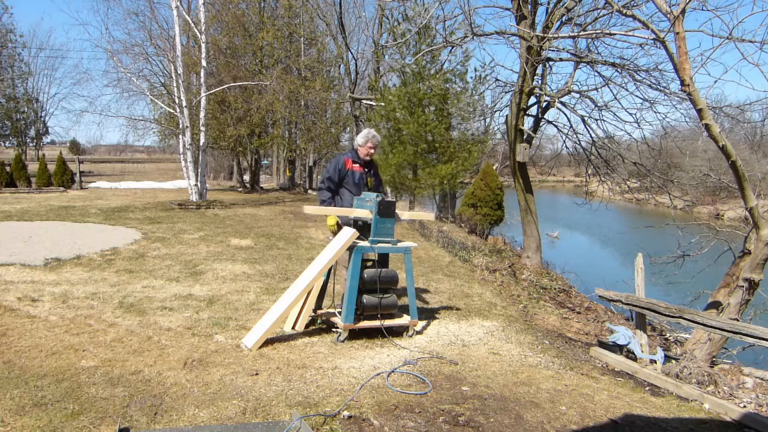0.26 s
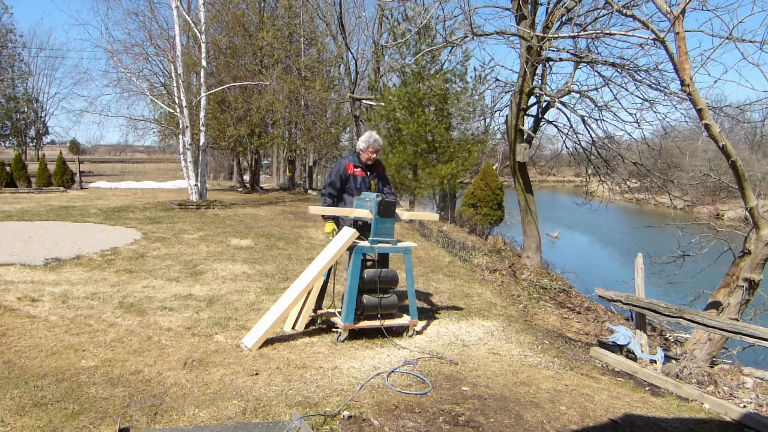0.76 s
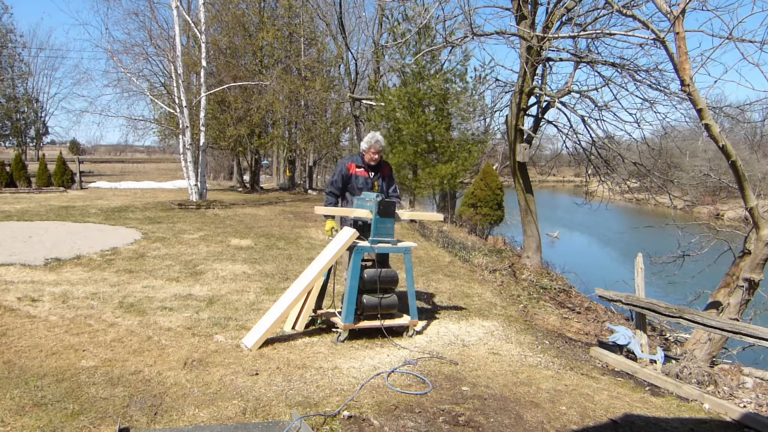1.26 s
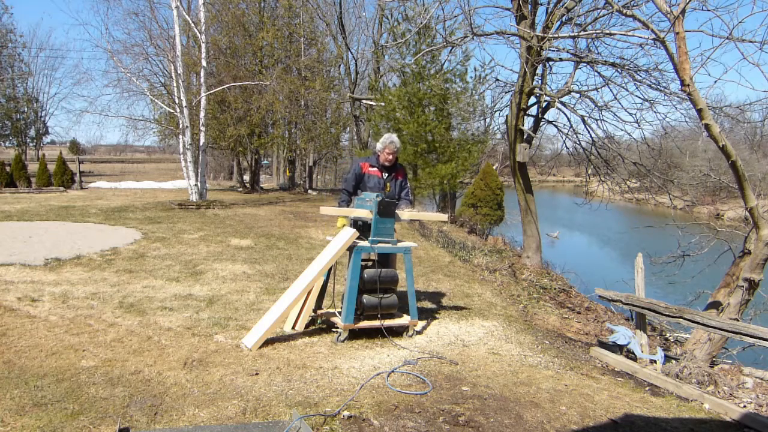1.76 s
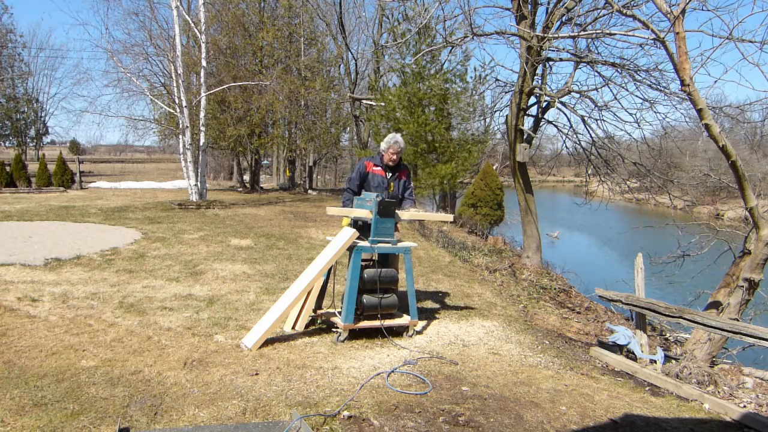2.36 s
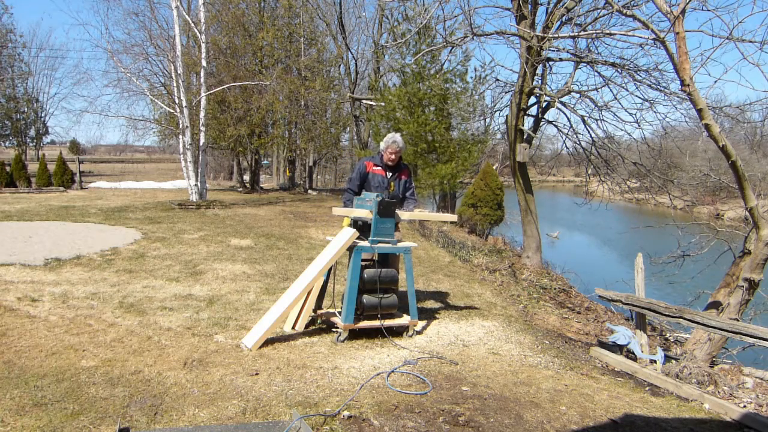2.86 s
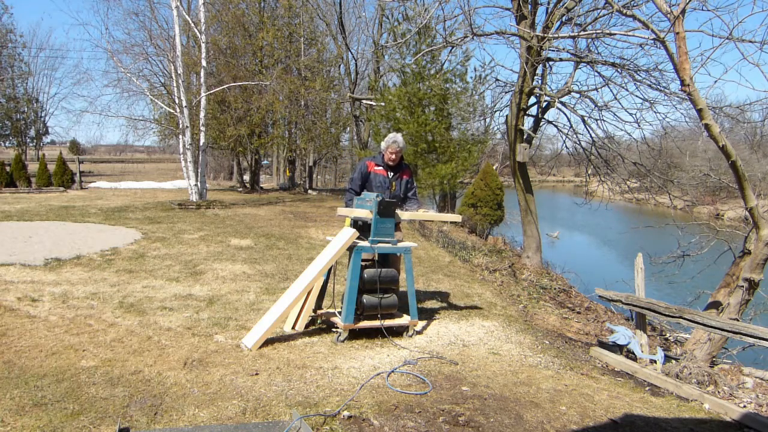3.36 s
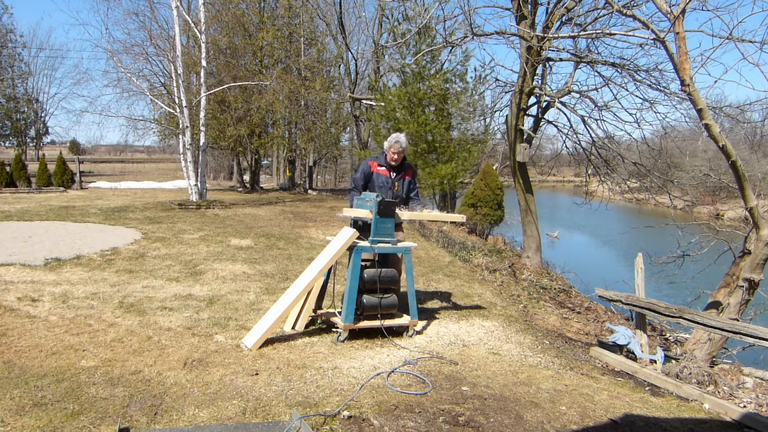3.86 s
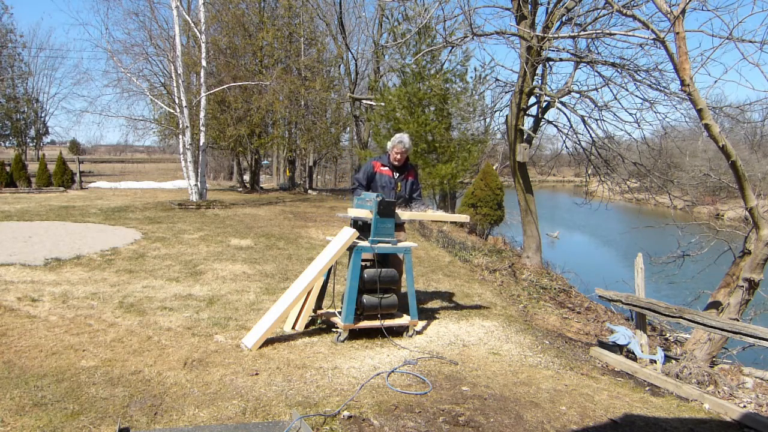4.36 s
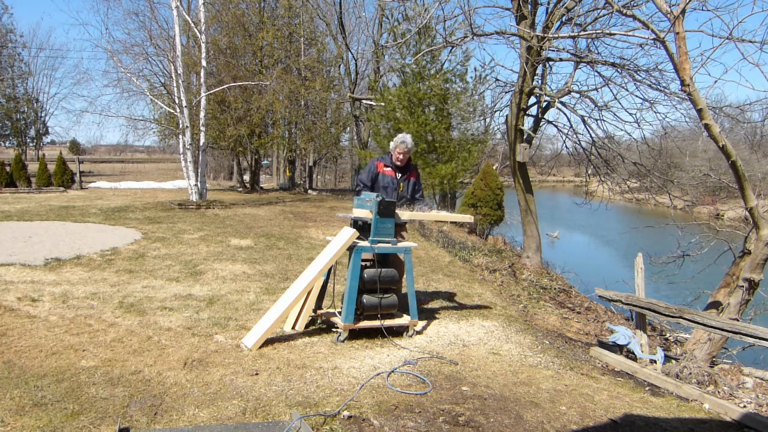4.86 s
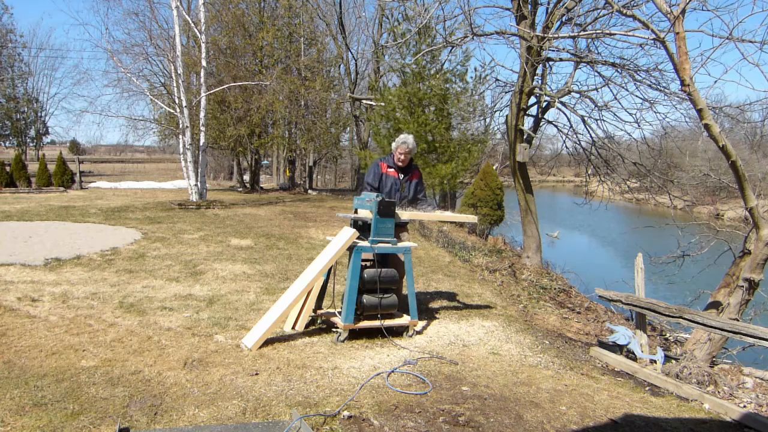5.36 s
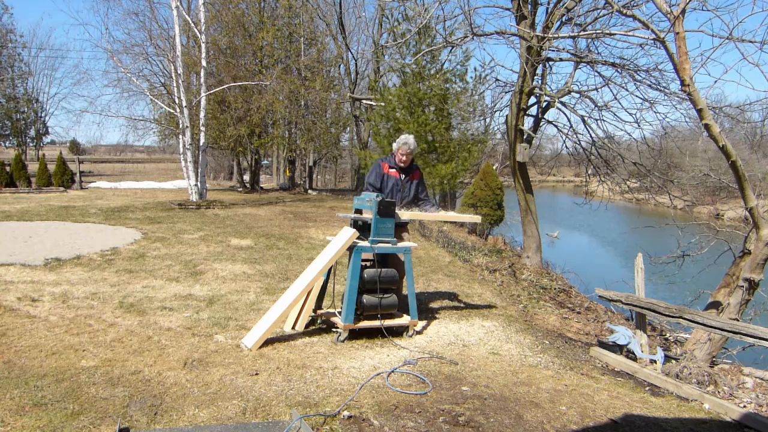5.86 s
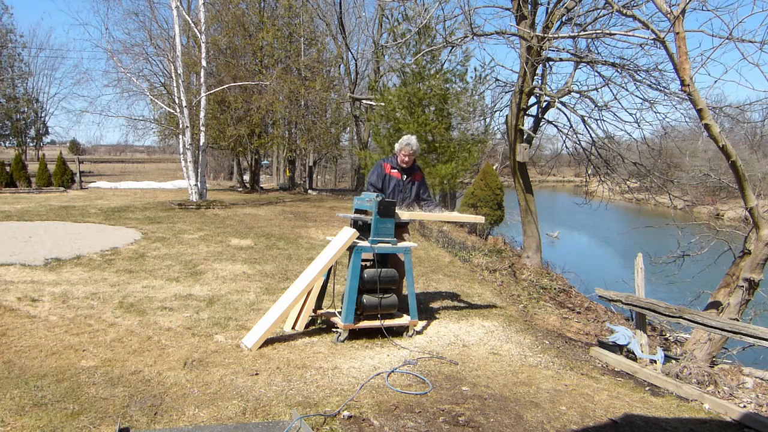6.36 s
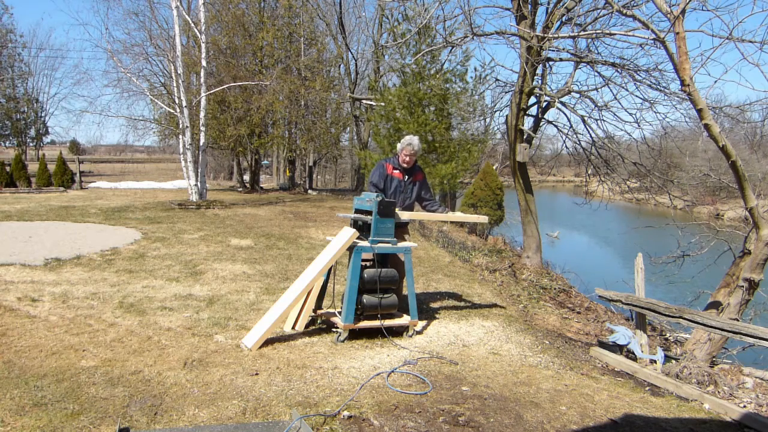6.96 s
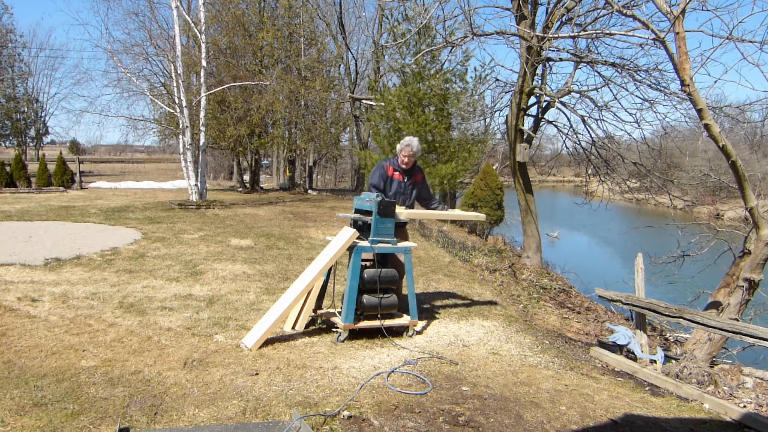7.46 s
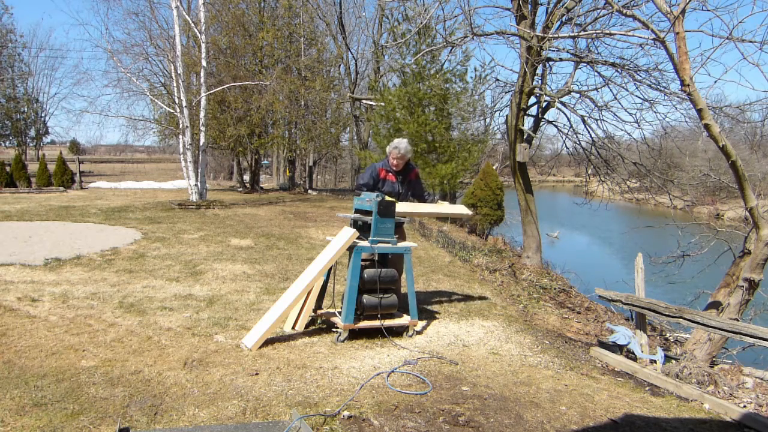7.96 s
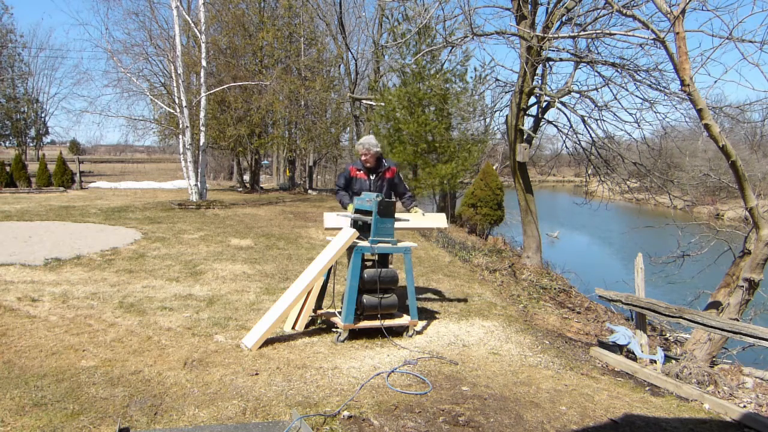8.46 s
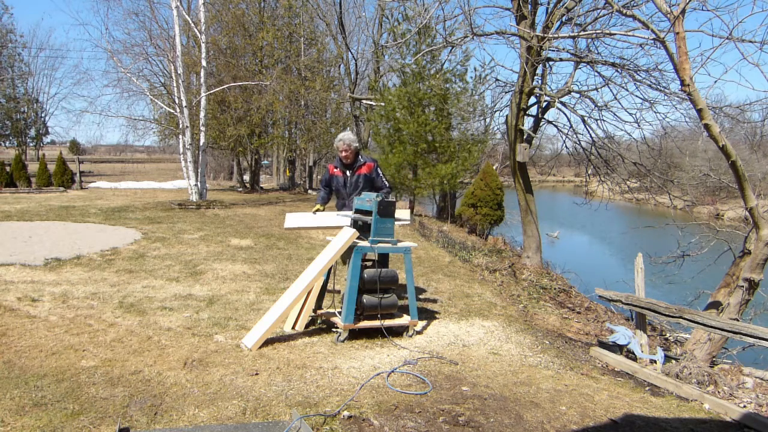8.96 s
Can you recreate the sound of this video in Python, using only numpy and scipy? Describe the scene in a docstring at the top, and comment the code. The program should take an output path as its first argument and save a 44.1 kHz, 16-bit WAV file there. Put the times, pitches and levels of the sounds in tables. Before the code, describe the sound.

On an open lawn, a small electric planer cuts a rough board some metres from the microphone. A harsh low buzz with a wandering nasal howl, brief squeals and crackling chips rides over motor whine and fan rush. After about six and a half seconds the cutting stops suddenly; the unloaded motor speeds up slightly, with a hollow roar from the chip outlet and faint wind beneath.

```python
"""Wood planer on a lawn, some metres from the microphone, over a faint rumble of wind.
0-6.6 s: knives beat on a rough board (stack of strike lines through shifting resonances), chips crackle
(gated noise), the motor whines (shaft-locked sines) and its fan roars (shaped noise).
6.6 s: the board leaves the knives; buzz and crackle stop, the chip outlet opens to a hollow roar.
After: the unloaded motor runs up towards free speed, faltering near 7.2 s; bare knives hum faintly."""
import sys
import numpy as np
from scipy import signal
from scipy.fft import rfft, irfft
from scipy.io import wavfile
from scipy.ndimage import map_coordinates

SR = 44100
rng = np.random.default_rng(int(sys.argv[2]) if len(sys.argv) > 2 else 0)


def int16_out(signal):
    """Quantize to a 16-bit WAV file."""
    q = np.round(np.clip(np.atleast_2d(signal).T, -1, 1) * 32767)
    wavfile.write(sys.argv[1], SR, q.astype(np.int16))


N = 406602
T = np.arange(N) / SR
BINS_HZ = np.fft.rfftfreq(N, 1 / SR)
STEPS_S = T[::128]  # slow controls

# wind spectrum, relative: frequency_hz, density_db
WIND = [(15, -9), (28, -5), (45, -23), (80, -31), (150, -31), (400, -68)]
# microphone ports: frequency_hz, left_minus_right_db
PORT_BALANCE = [(60, 0.0), (110, 0.0), (200, -0.081), (370, -2), (680, -1), (1260, 2.5), (2310, -0.63),
                (4240, 1.8), (7790, -0.7), (14300, 1)]
# microphone ports: frequency_hz, left_lead_rad
PORT_PHASE = [(100, -0.35), (420, -0.62), (690, -0.3), (950, 0.92), (2150, -0.32), (2840, 0.68),
              (3700, -0.69), (4570, 0.13), (6550, -0.14), (7060, -1.46), (7580, -0.41), (8440, 1),
              (9300, 1), (10400, -0.29), (14500, 0.12)]
# sound scattered from the sides by ground and trees: frequency_hz, level_re_direct_db
SCATTER = [(400, -16), (650, -11), (1300, -12.5), (2500, -11.5), (5000, -11), (8000, -10.5), (13000, -7)]
# cooling fan spectrum, relative: frequency_hz, density_db
FAN = [(140, -64), (210, -20.5), (280, -16), (380, -10), (520, -3), (800, -5), (1400, 0.5), (3000, -1),
       (5000, -1.5), (7000, -4), (8500, -8), (10200, -17), (11500, -31), (14000, -45)]
# peaks and dips where the lawn's reflection meets the direct sound: centre_hz, width_hz, gain_db
GROUND_COMB = [(625, 51, 3.5), (696, 26, 7), (905, 22, 3), (1036, 43, -11.5), (1343, 23, 4.5),
               (1643, 72, -4), (1830, 64, 4), (2090, 41, -4.5), (2237, 110, 4.5), (2840, 22, -3),
               (3010, 82, 4), (3170, 22, 8), (3410, 72, -2), (3746, 81, -7.5), (4163, 84, 6),
               (4260, 68, -17), (4660, 38, -0.5), (4945, 130, 6.5), (5330, 53, 6), (5540, 80, -5.5),
               (5900, 160, -3), (6875, 66, 6.5)]
# motor lines (shaft, fan blades, commutator): shaft_multiple, level_at_reference_speed_db
MOTOR_ORDERS = [(1, -65), (2, -56.5), (3, -61.5), (6, -58), (7, -56.5), (12, -53.5), (24, -57), (36, -73)]
# casing rings and dips, each driven by one motor line: shaft_multiple, centre_hz, width_hz, gain_at_full_coupling_db
CASING = [(1, 303, 10, 9), (2, 614, 14, 9), (3, 735, 25, 10), (3, 918, 30, 5), (6, 1465, 150, 18),
          (6, 1610, 45, 6), (7, 1685, 55, 15), (7, 1806, 18, 20), (7, 1860, 31, 21.5), (7, 1911, 16, 19),
          (12, 2840, 70, 9), (12, 3112, 33, 17.5), (12, 3178, 35, 16), (12, 3268, 26, 13),
          (12, 3330, 35, -5), (12, 3385, 25, 7), (12, 3435, 28, 17), (12, 3482, 20, 5),
          (12, 3528, 23, 13.5), (12, 3612, 19, 11), (12, 3646, 17, 11), (24, 6620, 130, 11),
          (24, 6980, 240, 10), (24, 7190, 50, 4), (36, 9720, 430, 21), (36, 10080, 100, 8),
          (36, 10700, 110, 10)]
# bare knives chopping air: strike_multiple, level_at_reference_speed_db
KNIFE_AIR = [(4, -53.5), (6, -61)]
# cutter pace under load: time_s, strike_rate_hz
CUT_RATE = [(0.05, 106.3), (0.21, 105.7), (1.05, 105.1), (1.76, 107.3), (2.09, 107.4), (2.29, 107.1),
            (2.8, 107.3), (3.95, 104.8), (4.37, 102.2), (4.55, 102.1), (6.13, 102.4), (6.59, 104.7)]
# tearing fibres and flying chips, relative: frequency_hz, density_db
CHIPS = [(130, -34), (200, -8), (350, -43), (600, -5), (950, 1), (1200, 11), (1500, 6.5), (1850, 7.5),
         (2300, -18), (2850, -10), (3400, -28), (4300, -10), (7500, -0.5), (11000, -11.5), (13500, -25)]
# grain tearing along the board: time_s, crackle_gain_db
TEAR = [(0, -0.5), (1.4, -1), (2.1, -2), (3.0, -1.5), (4.1, -2.5), (4.7, 0.5), (5.5, 1), (6.5, 1)]
# knife buzz between and above the board resonances: frequency_hz, line_level_db
KNIFE_LINES = [(105, -105), (210, -74.5), (320, -73.5), (640, -63.5), (950, -60.5), (1080, -56),
               (1500, -54.5), (1900, -54.5), (2250, -55.5), (2600, -56.5), (3300, -59.5), (4200, -65.5),
               (6000, -60)]
# squeals where the board catches on the knife line nearest pitch_hz: centre_s, half_length_s, pitch_hz, level_db
SQUEALS = [(.1, 0.32, 2445, -46.5), (0.097, 0.11, 1590, -47), (0.123, .12, 1915, -45),
           (.554, 0.23, 2955, -45.5), (.75, 0.16, 1472, -57), (.85, .35, 1790, -46), (.86, .3, 2850, -48.5),
           (1.148, 0.32, 3480, -47), (1.48, .16, 1490, -43), (1.994, 0.31, 2362, -53),
           (2.3, 0.33, 2895, -53), (2.6, 0.5, 1394, -41), (2.57, 0.14, 1822, -39.5), (2.7, 0.74, 1073, -50),
           (3.052, .17, 2675, -51), (3.052, .1, 3955, -49), (3.12, 0.16, 1170, -41.5),
           (3.43, 0.18, 1904, -42), (3.66, 0.25, 3480, -50), (3.75, 0.17, 1368, -46),
           (3.85, 0.075, 2000, -42), (3.9, 0.14, 2205, -44.5), (3.97, 0.11, 733, -45),
           (4.052, 0.072, 1146, -36.5), (4.134, 0.067, 1352, -43), (4.2, .08, 1447, -44.5),
           (4.3, 0.13, 3490, -49), (4.5, .25, 1838, -45.5), (4.65, 0.3, 2040, -47),
           (5.258, .2, 3478, -47.5), (5.65, 0.98, 1126, -43), (5.7, 0.85, 1433, -48),
           (6.15, 0.27, 2870, -49.5), (6.53, 0.19, 1146, -37)]
# board bending resonances; shift_hz and load_gain_db at full load, dip_db as the knives pass a node:
# centre_hz, width_hz, level_db, shift_hz, load_gain_db, node_s, node_spacing_s, dip_db
BOARD_MODES = [(415.5, 50.2, -42.5, 9.5, -2.1, 2.24, 3.77, 5), (513, 30, -45.5, -8, 3, 3.03, 5.1, 3.5),
               (625, 36, -62.5, -12, 22.5, 3.6, 4.7, 3), (745, 23, -45.5, -20, -2.5, 2.19, 2.96, 24),
               (845, 33, -45.5, -25, -3.5, 2.1, 2.48, 12.5)]
# loudest board resonance, wandering with the feed: time_s, centre_hz, level_db
HOWL = [(0, 1310, -41.5), (.45, 1224, -40), (.75, 1190, -41.5), (1.2, 1250, -41.5), (1.48, 1270, -36.5),
        (1.7, 1310, -43.5), (2.0, 1350, -39.5), (2.85, 1360, -40), (3.15, 1340, -45), (3.45, 1270, -40),
        (3.8, 1210, -40), (4.05, 1135, -37), (4.17, 1140, -41), (4.35, 1200, -41), (4.65, 1240, -39.5),
        (4.95, 1235, -39.5), (5.3, 1310, -40), (6.1, 1330, -42), (6.5, 1300, -46)]
# rasp above the howl, also wandering: time_s, centre_hz, level_db
RASP = [(0, 1760, -42), (.4, 1800, -45), (.85, 1790, -43.5), (1.35, 1780, -46.5), (1.7, 1700, -42.5),
        (2.25, 1630, -43), (3.1, 1626, -40), (3.5, 1690, -48), (4.05, 1660, -54), (4.35, 1785, -42),
        (5.25, 1740, -45.5), (5.85, 1730, -42), (6.5, 1770, -53)]

STRIKES_PER_TURN = .4342  # knife strikes per motor shaft turn
REFERENCE_SHAFT_HZ = 300
FREE_SHAFT_HZ, RUN_UP_TAU_S = 311.7, .82
# one falter in the run-up, perhaps as the rollers push the board's tail out
FALTER_S, FALTER_HALF_S, FALTER_SHAFT_HZ = 7.16, .28, 2.7
LIGHT_CUT_HZ, HEAVY_CUT_HZ = 107.4, 102.1  # strike rates at load 0 and 1
BOARD_OUT_S, BOARD_OUT_FADE_S = 6.63, .082
OUTLET_BLOCKED_DB, OUTLET_OPEN_DB, OUTLET_CLEAR_S = -55.5, -47, .55
WHINE_RATTLE_DB, WHINE_RATTLE_HZ = 2.1, 120
CHIP_SCATTER_DB = 3.5  # either way
BITE_DB, BITE_LOAD_DB = 0, -3  # light cut; change at full load
PINNED_SHARE = .6  # share of strike smear lost at full load
STRIKE_JITTER_RAD = .1
HOWL_WIDTH_HZ, RASP_WIDTH_HZ = 54, 92
TOP_HZ = 13900


def undb(db):
    """Decibels to gain."""
    return 10 ** (np.asarray(db) / 20)


def unit(x):
    """Scale to rms 1."""
    return x / np.sqrt(np.mean(x ** 2))


def curve(rows, times_s):
    """Interpolate each column of a time table linearly."""
    knots_s, *columns = np.transpose(rows)
    return [np.interp(times_s, knots_s, column) for column in columns]


def slope(points, hz):
    """Read a spectrum on a log-frequency axis."""
    f_hz, value = np.transpose(points)
    return np.interp(np.log(np.maximum(hz, 1)), np.log(f_hz), value)


def bells(peaks, hz):
    """Summed gain in dB of bell-shaped peaks and dips."""
    return sum(db * np.exp(-((hz - centre_hz) / width_hz) ** 2) for centre_hz, width_hz, db in peaks)


def colour(x, db):
    """Filter by a gain in dB per frequency bin."""
    return irfft(rfft(x) * undb(db), N)


def walk(rate_hz, times_s):
    """Smooth random wandering, spread near 1."""
    knots = rng.standard_normal(4096)
    return map_coordinates(knots, [times_s * rate_hz + 2], order=3, mode="mirror")


def smooth(control):
    """Bring a slow control up to the sample rate."""
    return np.interp(T, STEPS_S, control)


def speed_gain_db(shaft_hz, law_db):
    """Level change with shaft speed: law_db per tenfold speed."""
    return law_db * np.log10(shaft_hz / REFERENCE_SHAFT_HZ)


def breeze(level_db=-75, gust_db=2):
    """Wind at one port: low-pitched noise with wandering level."""
    rumble = unit(colour(rng.standard_normal(N), slope(WIND, BINS_HZ)))
    return rumble * smooth(undb(level_db + gust_db * walk(4.8, STEPS_S)))


def outdoors(x, t60_s=0.3, first_s=0.0104):
    """Direct sound at two ports plus a weak decaying tail from the sides, opposite in sign at the ports."""
    tail = rng.standard_normal(N) * undb(-60 * np.minimum(T / t60_s, 10)) * (T > first_s)
    scattered = rfft(tail / np.linalg.norm(tail)) * undb(slope(SCATTER, BINS_HZ))
    side = np.array([[1], [-1]])
    balance = undb(side * slope(PORT_BALANCE, BINS_HZ) / 2)
    phase = np.exp(1j * side * slope(PORT_PHASE, BINS_HZ) / 2)
    return irfft(rfft(x) * (balance * phase + side * scattered), N)


def shaft_speed():
    """The cut holds the motor back; freed, it nears its top speed exponentially against fan drag."""
    strike_hz, = curve(CUT_RATE, STEPS_S)
    held_hz = strike_hz / STRIKES_PER_TURN
    freed_s = np.maximum(STEPS_S - CUT_RATE[-1][0], 0)
    run_up = 1 - np.exp(-freed_s / RUN_UP_TAU_S)
    falter_hz = FALTER_SHAFT_HZ * np.exp(-((STEPS_S - FALTER_S) / FALTER_HALF_S) ** 2)
    return held_hz + (FREE_SHAFT_HZ - held_hz) * run_up - falter_hz


def outlet(centre_hz=585, width_hz=56, flutter_db=2.3):
    """The spinning head stirs air in the chip outlet: resonant noise, louder once the board clears it."""
    level_db = np.interp(STEPS_S - BOARD_OUT_S, [0, OUTLET_CLEAR_S], [OUTLET_BLOCKED_DB, OUTLET_OPEN_DB])
    resonance_db = -20 * np.log10(1 + ((BINS_HZ - centre_hz) / width_hz) ** 4)
    roar = unit(colour(rng.standard_normal(N), resonance_db))
    return roar * smooth(undb(level_db + flutter_db * walk(22, STEPS_S)))


def knife_air(shaft_hz, beats, speed_law_db=140, waver_db=4):
    """Bare knives chop the air like a weak siren, rising with the motor."""
    out = 0
    for multiple, db in KNIFE_AIR:
        level_db = db + speed_gain_db(shaft_hz, speed_law_db) + waver_db * walk(18, STEPS_S)
        out = out + smooth(undb(level_db)) * np.sqrt(2) * np.sin(2 * np.pi * round(multiple) * beats)
    return out


def fan(shaft_hz, level_db=-33.0, speed_law_db=60, flicker_db=0.6):
    """Rushing air, combed by the ground reflection: shaped noise rising steeply with speed."""
    air = unit(colour(rng.standard_normal(N), slope(FAN, BINS_HZ) + bells(GROUND_COMB, BINS_HZ)))
    flicker = flicker_db * walk(12, STEPS_S)
    return air * smooth(undb(level_db + speed_gain_db(shaft_hz, speed_law_db) + flicker))


def motor(shaft_hz, turns, speed_law_db=60, waver_db=1.5, jitter_rad=0.016, coupling=0.89):
    """Shaft, blade and commutator lines grow with speed, flare at casing rings and roughen as it rattles."""
    wobble = jitter_rad * smooth(walk(45, STEPS_S))
    out = 0
    for multiple, db in MOTOR_ORDERS:
        k = round(multiple)
        rings = [ring[1:] for ring in CASING if ring[0] == k]
        flare_db = coupling * bells(rings, k * shaft_hz)
        rough_db = waver_db * walk(28, STEPS_S) + WHINE_RATTLE_DB * walk(WHINE_RATTLE_HZ, STEPS_S)
        level_db = db + speed_gain_db(shaft_hz, speed_law_db) + flare_db + rough_db
        phase = k * (2 * np.pi * turns + wobble) + rng.uniform(0, 2 * np.pi)
        out = out + smooth(undb(level_db)) * np.sqrt(2) * np.sin(phase)
    return out


def chips(beats, bite_db, level_db=-43.0, burst_strikes=0.59, steady=0.75):
    """Each strike tears off a chip: a noise burst of its own size over a steady spray."""
    size = undb(CHIP_SCATTER_DB * rng.uniform(-1, 1, 2048))
    strike = beats + 0.13
    gate = steady + size[strike.astype(int)] * np.exp(-(strike % 1) / burst_strikes)
    spectrum_db = slope(CHIPS, BINS_HZ) + 0.076 * bells(GROUND_COMB, BINS_HZ)
    crackle = colour(gate * rng.standard_normal(N), spectrum_db)
    tear_db, = curve(TEAR, STEPS_S)
    return unit(crackle) * undb(level_db + smooth(bite_db + tear_db))


def board(load):
    """Howl and rasp wander over time; the other board resonances shift with load and fade at their nodes."""
    howl_hz, howl_db = curve(HOWL, STEPS_S)
    rasp_hz, rasp_db = curve(RASP, STEPS_S)
    resonances = [(howl_hz, HOWL_WIDTH_HZ, howl_db), (rasp_hz, RASP_WIDTH_HZ, rasp_db)]
    for hz, width_hz, db, shift_hz, load_db, node_s, spacing_s, dip_db in BOARD_MODES:
        at_node = np.cos(np.pi * (STEPS_S - node_s) / spacing_s) ** 4
        level_db = db + load_db * load - dip_db * at_node
        resonances.append((hz + shift_hz * load, width_hz, level_db))
    return resonances


def knife_power(orders, rate_hz, bite_db, load, patchy_db, uneven_db):
    """Power of each strike line: buzz, board resonances shared among nearby lines, and squeals."""
    hz = orders[:, None] * rate_hz
    grain = np.tanh([walk(2.244, STEPS_S) for _ in orders])  # wood grain favours changing lines
    power = undb(slope(KNIFE_LINES, hz) + bite_db + patchy_db * grain) ** 2
    # ground-reflection dips hold some lines back
    escape = undb(uneven_db * grain + np.minimum(bells(GROUND_COMB, hz), 0)) ** 2
    for centre_hz, width_hz, db in board(load):
        share = escape * np.exp(-((hz - centre_hz) / width_hz) ** 2)
        power = power + undb(db) ** 2 * share / share.sum(axis=0)
    for centre_s, half_s, squeal_hz, db in SQUEALS:
        nearest = np.argmin(abs(orders * np.interp(centre_s, STEPS_S, rate_hz) - squeal_hz))
        power[nearest] += undb(db) ** 2 * np.exp(-((STEPS_S - centre_s) / half_s) ** 2)
    return power


def knives(shaft_hz, beats, bite_db, load, patchy_db=6.5, uneven_db=2.5, flutter_db=0.88, waver_db=1.0,
           smear_low_rad=1.0, smear_rad_per_khz=0.16, dispersion_rad=0.00503):
    """Each knife strike kicks the board: a stack of lines, loud where the board resonates."""
    orders = np.arange(2, 56)
    rate_hz = shaft_hz * STRIKES_PER_TURN
    power = knife_power(orders, rate_hz, bite_db, load, patchy_db, uneven_db)
    out = 0
    for k, gain in zip(orders, np.sqrt(2 * power)):
        # wood scrambles the treble more; a heavy cut pins the board, so strikes are crisper
        smear_rad = smear_low_rad + smear_rad_per_khz * k * rate_hz / 1000
        smear_rad = smear_rad * (1 - PINNED_SHARE * load)
        # bending waves run faster at high pitch: each strike is a short burst
        lag_rad = dispersion_rad * k ** 2 + smear_rad * walk(0.661, STEPS_S)
        lag_rad = lag_rad + STRIKE_JITTER_RAD * walk(35, STEPS_S)
        shake = undb(flutter_db * walk(25, STEPS_S) + waver_db * walk(9, STEPS_S))
        out = out + smooth(gain * shake) * np.cos(2 * np.pi * k * beats + smooth(lag_rad))
    return out


def scene():
    """One shaft drives the fan and, through a belt, the knives."""
    shaft_hz = shaft_speed()
    load = np.clip((LIGHT_CUT_HZ - shaft_hz * STRIKES_PER_TURN) / (LIGHT_CUT_HZ - HEAVY_CUT_HZ), 0, 1)
    bite_db = BITE_DB + BITE_LOAD_DB * load  # buzz and crackle weaken as the head slows
    turns = np.cumsum(smooth(shaft_hz)) / SR
    beats = turns * STRIKES_PER_TURN
    contact = np.clip(.5 + (BOARD_OUT_S - T) / BOARD_OUT_FADE_S, 0, 1)
    cleared = np.clip((T - BOARD_OUT_S) / OUTLET_CLEAR_S, 0, 1) ** 2
    wind = np.array([breeze(), breeze()])
    machine = outlet() + fan(shaft_hz) + motor(shaft_hz, turns)
    bare_knives = cleared * knife_air(shaft_hz, beats)
    cutting = contact * (chips(beats, bite_db) + knives(shaft_hz, beats, bite_db, load))
    return wind + outdoors(machine + bare_knives + cutting)


def record(dry):
    """The recorder cuts the top: steep elliptic low-pass."""
    return signal.sosfilt(signal.ellip(8, .2, 70, TOP_HZ, fs=SR, output="sos"), dry)


dry = scene()
out = record(dry)
int16_out(out)
```